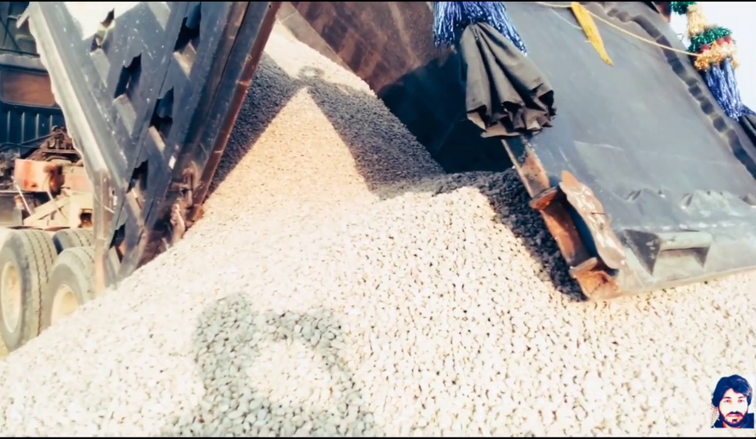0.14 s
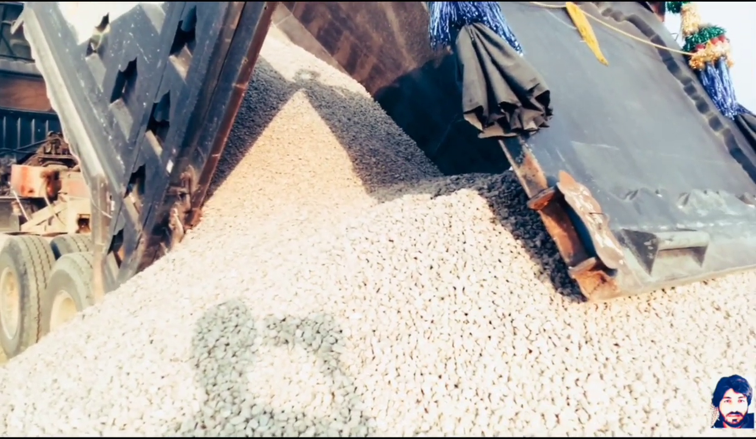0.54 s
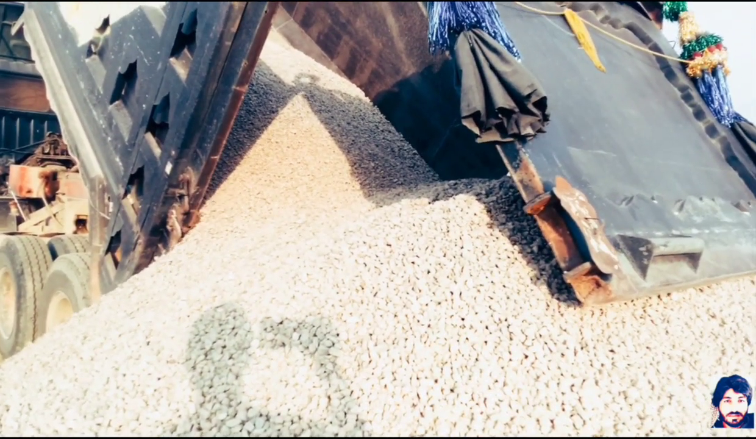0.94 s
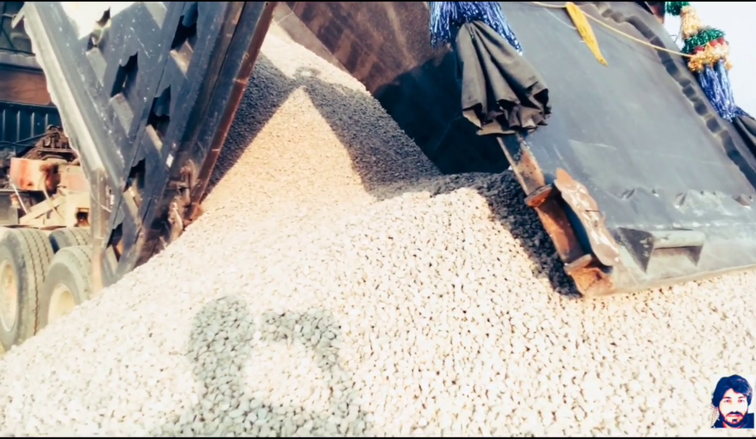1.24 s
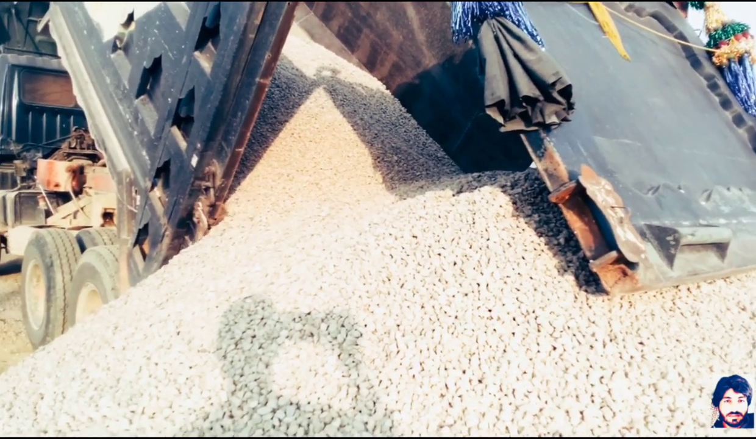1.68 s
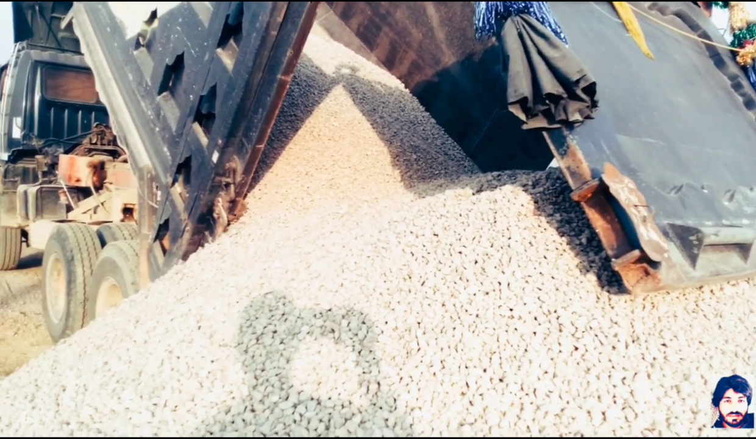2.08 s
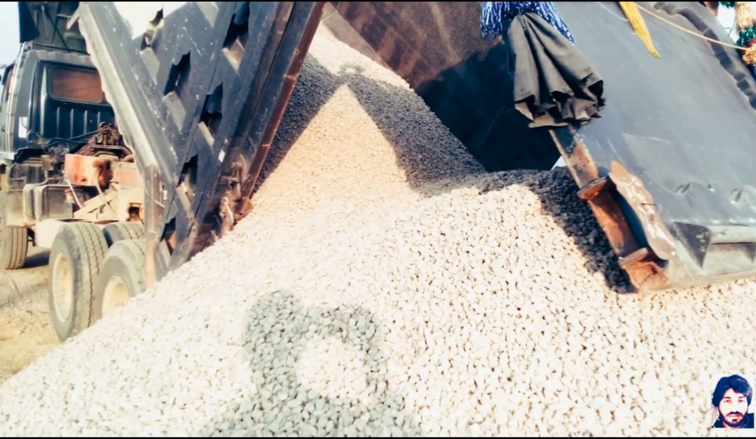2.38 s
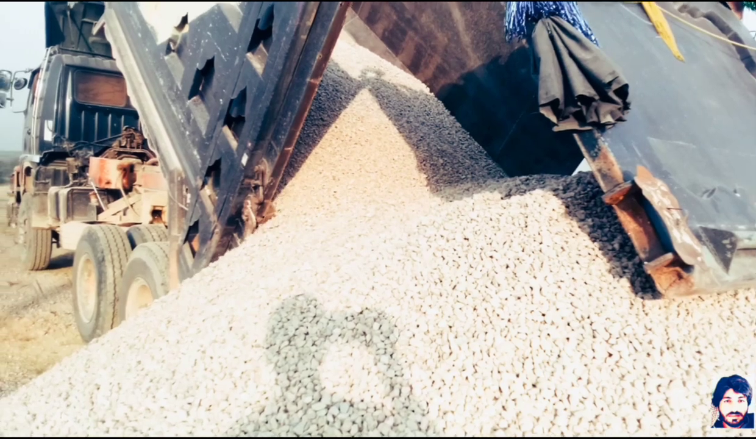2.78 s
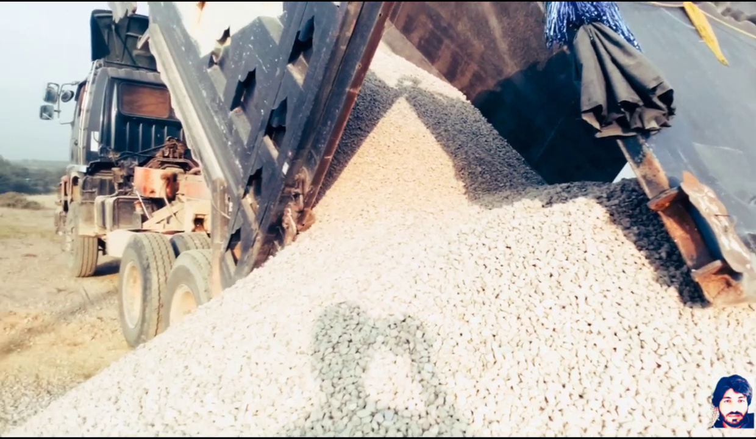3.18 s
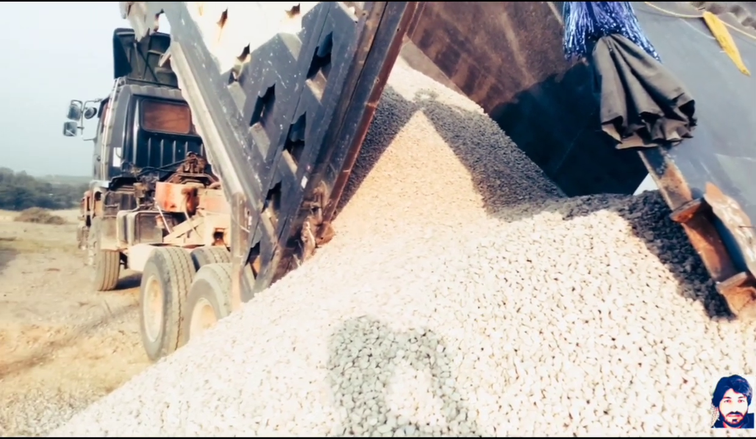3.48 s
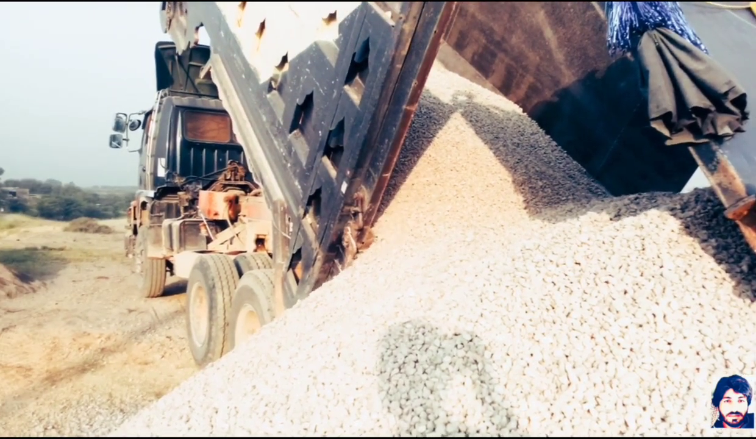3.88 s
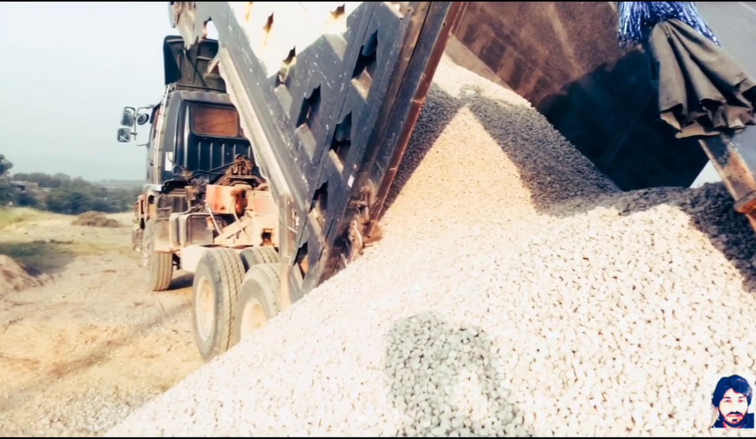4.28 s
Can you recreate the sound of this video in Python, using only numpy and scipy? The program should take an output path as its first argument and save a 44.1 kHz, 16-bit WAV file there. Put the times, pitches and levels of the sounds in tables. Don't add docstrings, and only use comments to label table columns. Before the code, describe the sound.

Close, crisp gravel slides from a tipped truck bed onto a heap in the open air. It pours hardest at first, lurching in bursts with stone clacks, spills and dull plate booms. A diesel idles steadily behind with rapid knocking and a weak low hum. Midway the microphone turns toward the cab and the stone tone shifts; the flow finally thins to stray pebbles and small squeaks. Small microphone, little bass.

```python
import sys
import numpy as np
from scipy import signal
from scipy.fft import rfft, irfft
from scipy.io import wavfile

SR = 44100
rng = np.random.default_rng(int(sys.argv[2]) if len(sys.argv) > 2 else 0)


def dump_mix(stems):
    frames = np.atleast_2d(stems).T
    limited = np.clip(frames, -1, 1)
    pcm = np.round(limited * 32767).astype(np.int16)
    wavfile.write(sys.argv[1], SR, pcm)


def ratio_of_db(decibels):
    return 10 ** (np.asarray(decibels, float) / 20)


N = 195451

# pitch in Hz, level in dB per Hz.
STONE_FACING_BED = [(880, -6), (1500, -2.5), (2050, -11), (2240, -7.5), (2490, -15.5), (2750, -6.5),
                    (4020, -3), (5820, 0), (6680, -7), (7430, -5), (8770, -7.5), (10700, -12), (13300, -23),
                    (15400, -9)]
# pitch in Hz, level in dB per Hz.
STONE_FACING_CAB = [(880, -23.5), (1500, -9), (1880, -13), (2400, -12), (2830, -5), (3340, -5), (3830, 1.5),
                    (4980, -5.5), (5770, 0), (6550, -4.5), (7360, -0.5), (10400, -14.5), (12500, -25),
                    (15400, -10.5)]
# time in seconds, level of the gravel in dB.
FLOW = [(0.0, -44), (0.38, -42.5), (0.46, -42), (1.18, -46.5), (1.29, -43), (2.05, -46), (2.43, -47.5),
        (2.76, -46.5), (2.94, -46.5), (3.39, -47.5), (3.82, -48.5), (4.06, -47), (4.18, -46.5),
        (4.43, -48.5)]
# lowest Hz, highest Hz, contacts per second,
# spread in dB, share of hard contacts, level in dB.
STONE_SIZES = [(2790, 6670, 3000, 1.4, 0.48, 0.12), (6530, 11120, 2200, 4.2, 0.9, 1.83),
               (10590, 18000, 1100, 5.5, 1.36, 6.0), (1207, 2716, 2000, 4.2, 1.1, 0.62)]
# time in seconds, grit in dB, dust in dB.
PUFFS = [(.33, -2, 5), (.66, 5.5, 4), (.75, 2.5, 4), (1.17, -2, 3), (1.24, 3.5, -5), (1.43, 1, -4),
         (1.5, 0, -4), (1.71, 3, 6), (1.91, 1, 4), (1.99, -2.5, 0), (2.03, 2, 1), (2.21, -1, 4),
         (2.39, 1, 2), (2.49, -5, -7), (2.512, -0.5, -1), (1.075, -4, -1), (2.59, 3, -7), (2.73, -2, -1),
         (2.91, -1.5, -2), (3.05, -3, 1), (3.16, 6.5, 3), (3.25, 3, 2), (3.39, 1, 2.5), (3.58, 3.5, 4),
         (3.69, 1, -6), (3.85, -2, 3), (3.91, -1.5, 1), (3.97, -2, 2), (4.06, 0, -2)]
# crest in seconds, big stones in dB, bed plate in dB, length in seconds.
LURCHES = [(0.0, -53, -54, 0.04), (0.139, -76, -60.5, 0.045), (0.223, -44, -63, 0.083),
           (0.325, -45, -64, 0.037), (0.5, -53.5, -64.5, 0.49), (0.756, -50.5, -61, 0.19),
           (1.34, -51, -63, 0.47), (1.536, -56, -70.5, 0.89), (1.842, -51, -102, 0.11),
           (2.088, -52.5, -67, 0.11), (2.314, -50.5, -64, 0.15), (2.66, -43.5, -61.5, 0.23),
           (2.854, -47, -67, 0.19), (2.953, -66, -59.5, 0.059), (3.178, -49.5, -65, 0.17),
           (3.443, -49.5, -67, 0.24), (4.265, -62, -66.5, 1), (1.017, -56, -62, 0.069),
           (1.65, -49, -81, 0.031), (1.975, -56, -80, 0.051), (3.085, -51, -79, 0.044),
           (3.74, -58, -63, 0.11), (4.245, -58, -65, 0.026)]
# start in seconds, peak in dB, centre in Hz, share of grit in dB.
SPILLS = [(0.2095, -17, 5940, -9), (0.299, -31, 4470, -5), (0.422, -19.5, 5340, -1),
          (0.5122, -38, 4460, -20), (0.5778, -25, 5320, 14.5), (0.653, -22, 4300, -19),
          (0.732, -19.5, 2900, -27), (0.812, -20, 6100, -13), (0.972, -22, 4000, -21),
          (1.156, -16, 5800, -5), (1.3155, -20, 5030, -8), (1.3826, -24.5, 5400, -13),
          (1.629, -24, 3900, -27), (1.7415, -20, 3970, -27), (1.7937, -26, 4180, 8), (1.808, -18, 5800, -3),
          (1.012, -22.5, 5200, -6), (1.198, -21, 5000, -6), (0.883, -22, 5200, -10),
          (2.579, -22.5, 5200, -8), (2.706, -23, 4600, -12), (3.115, -28, 4200, -8), (2.086, -18, 4670, -3),
          (2.2538, -19, 4930, -4), (2.269, -17.5, 4900, -12), (2.413, -24.5, 4600, 7),
          (2.527, -20.5, 4360, -9), (2.561, -23, 5600, -3), (2.615, -21.5, 4020, -18),
          (2.639, -23, 3400, -10), (2.66, -20.5, 4130, -18), (2.9463, -23.5, 3800, -2),
          (3.146, -19, 3280, -25), (3.352, -21, 4300, 4), (3.542, -21.5, 3540, -24),
          (3.721, -23, 4700, -20), (4.056, -15.5, 4700, -15), (4.365, -23, 5400, 1)]
# start in seconds, peak in dB, pitch in Hz.
CLACKS = [(0.1408, -27, 5680), (0.1494, -30, 4200), (0.1885, -30, 4300), (0.2122, -29, 5510),
          (0.219, -30, 5920), (0.2728, -36, 5250), (0.31, -26, 5800), (0.443, -29, 4330),
          (0.4561, -29, 5170), (0.477, -31, 4090), (0.493, -27, 4220), (0.515, -27, 5530),
          (0.519, -34, 4330), (0.5849, -25, 6090), (0.6155, -39, 5450), (0.6753, -30, 2840),
          (0.732, -38, 3900), (0.807, -20, 5960), (0.824, -26, 5810), (0.8307, -33, 4070),
          (0.8626, -33, 5450), (1.0058, -28, 5100), (1.1372, -20, 5580), (1.1569, -20, 4770),
          (1.1606, -26, 5530), (1.2051, -31, 4080), (1.266, -33, 4310), (1.3064, -26, 5700),
          (1.323, -28, 5250), (1.3254, -25, 4200), (1.331, -25, 5080), (1.3843, -26, 5490),
          (1.5287, -45, 5300), (1.5758, -34, 5750), (1.63, -24, 5560), (1.7478, -31, 5190),
          (1.7958, -27, 3810), (2.091, -21, 4360), (2.0952, -17, 5200), (2.2555, -27, 5430),
          (2.2753, -18, 4760), (2.415, -27, 4930), (2.616, -31, 3980), (2.6203, -33, 4330),
          (2.6453, -35, 2860), (2.662, -23, 5190), (2.7295, -28, 4670), (2.7395, -31, 5340),
          (2.8625, -28, 4030), (2.901, -28, 3700), (3.167, -30, 4090), (3.546, -31, 5960),
          (4.062, -26, 5480), (4.063, -25, 3680), (4.0707, -28, 4370), (4.072, -29, 4220),
          (4.367, -27, 5280)]
# start in seconds, peak in dB, peak of the bright edge in dB.
PEBBLES = [(0.126, -30, -47), (0.1683, -31, -39), (0.2155, -34, -45), (0.273, -26, -44), (0.3204, -33, -28),
           (0.4562, -25, -40), (0.5151, -27, -54), (0.5818, -34, -41), (0.5945, -25, -41),
           (0.7876, -21.5, -49), (0.8963, -34, -46), (0.9228, -31, -43), (0.9793, -39, -43),
           (0.9913, -26, -49), (1.005, -27, -38), (1.0662, -36, -44), (1.144, -24, -29), (1.1553, -34, -51),
           (1.165, -30, -43), (1.2053, -31, -44), (1.2195, -34, -47), (1.4617, -31, -46),
           (1.7957, -32, -51), (1.842, -29, -51), (1.885, -33, -50), (2.0977, -28, -47), (2.149, -29, -35),
           (2.1739, -31, -44), (2.2222, -35, -46), (2.2381, -32, -47), (2.3415, -28, -54),
           (2.3642, -34, -41), (2.4271, -25.5, -44), (2.4615, -35, -41), (2.7946, -24.5, -45),
           (2.8016, -28, -51), (2.8132, -35, -49), (3.0298, -36, -35), (3.0676, -35, -55),
           (3.2011, -29, -48), (3.2094, -32, -55), (3.2727, -32, -42), (3.3804, -28, -45),
           (3.3863, -26, -41), (3.4245, -29, -49), (3.4644, -29, -38), (3.6156, -26.5, -49),
           (3.817, -25, -50), (4.0359, -34, -41), (4.079, -27, -53), (4.142, -34, -43), (4.256, -45, -51),
           (4.3357, -23, -50), (4.3478, -36, -62), (4.3666, -36, -36), (4.403, -29, -44),
           (4.4203, -29, -47)]
# start in seconds, peak in dB, pitch in Hz.
DINGS = [(0.2134, -21.5, 2800), (0.31, -25, 2900), (0.312, -20, 2840), (0.7328, -26, 2900),
         (1.275, -23.5, 2700), (1.314, -23, 2350), (1.3833, -27, 2900), (1.632, -27, 2780),
         (2.2555, -27, 2830), (2.643, -20, 2900), (2.645, -22.5, 2200), (2.668, -26, 2260),
         (2.686, -32, 2550), (4.368, -27, 2790)]
# start in seconds, peak in dB, time to fall 60 dB in seconds.
PINGS = [
    (1.388, -54, .12),
    (1.648, -44, 0.34),
    (2.2538, -29.5, 0.18),
    (2.7387, -40, 0.09),
]
# start in seconds, length in seconds, first Hz, last Hz, peak in dB.
SQUEAKS = [(0.043, 0.024, 4100, 3990, -46), (.247, 0.051, 4130, 4140, -45), (0.317, 0.023, 4300, 4320, -44),
           (0.325, .012, 4300, 4230, -53), (0.482, 0.016, 4370, 4360, -43), (0.504, 0.019, 4210, 4390, -42),
           (0.657, .012, 4380, 4380, -43), (0.667, 0.017, 4380, 4380, -41), (0.856, 0.035, 4100, 4140, -42),
           (0.9, 0.02, 4350, 4300, -40.5), (1.261, 0.036, 4300, 4300, -47), (1.625, 0.044, 4250, 4230, -42),
           (1.663, .014, 4100, 3870, -46), (2.702, 0.015, 3930, 4050, -44), (3.44, .016, 4560, 4350, -43),
           (3.454, 0.018, 4180, 4100, -43), (3.476, .017, 4000, 3780, -44), (3.552, 0.033, 3660, 3730, -52),
           (4.138, 0.048, 4150, 4180, -44), (4.189, 0.014, 4170, 4130, -44.5),
           (4.227, .013, 4200, 4130, -44), (4.232, 0.052, 3470, 3660, -50),
           (3.373, 0.044, 2740, 2690, -49.5), (3.499, .014, 2750, 2800, -46),
           (4.037, 0.084, 2920, 2900, -54.5)]
# pitch in Hz, width in Hz, loose rattle in dB.
BLOCK_MODES = [(1028, 40, -64), (1135, 45, -64), (1258, 50, -55.5), (900, 60, -72), (1470, 120, -69)]
# crest in seconds after the
# cycle starts, level in dB.
KNOCKS = [
    [(0, -47), (.0136, -47), (.027, -53), (.038, -54), (.058, -53), (.098, -50), (.143, -46), (.1566, -51),
     (.177, -51), (.226, -58)],
    [(0, -42), (.0097, -47), (.054, -50), (.067, -53), (.098, -48), (.111, -50), (.1342, -49), (.143, -41),
     (.1544, -49), (.189, -50)],
    [(0, -41.5), (.00636, -42), (.044, -46), (.055, -48), (.069, -48), (.0885, -48), (.098, -44.5),
     (.116, -52), (.13505, -48), (.143, -44), (.15095, -47.5), (.176, -48), (.197, -49), (.232, -50)],
    [(.018, -54), (.051, -56), (.108, -57), (.14, -54), (.175, -56), (.193, -57)],
    [(.04, -55), (.092, -53), (.104, -54), (.178, -55), (.199, -55)],
]
CYCLE_EFFORT = [-0.46, -0.24, -0.36, 0.47, 0.83, -0.034, 1, 0.79, 0.3, -0.73, 0.9, 0.94, 0.64, 0.9, -0.011,
                -0.11, 1.3, 0.16]
# pitch in Hz, width in Hz, level in dB.
BED_RATTLE = [(1450, 240, -58.5), (564, 91, -67.5), (437, 127, -62), (2350, 80, -73), (2735, 17, -71.5),
              (2900, 390, -68)]
CYLINDER_PUFFS = [24, 21, 25, 32, 28, 19]
# pitch in Hz, level in dB, time to fall 60 dB in seconds.
EXHAUST_MODES = [(45.3, -102, .25), (69.4, -103, 0.22), (99, -68, 0.048), (125, -69.5, 0.11),
                 (151, -74, 0.066)]
# crest in seconds, level in dB, pitch
# in Hz.
BOOMS = [(0.03, -62, 409), (0.04, -63.5, 506), (0.13, -62.5, 597), (0.16, -57, 419), (0.42, -62, 866),
         (0.48, -63, 635), (0.62, -61, 602), (0.76, -63, 699), (0.77, -70, 834), (0.77, -58.5, 602),
         (0.8, -64.5, 231), (1.08, -65, 403), (1.36, -62, 597), (1.37, -63, 398), (1.39, -72, 899),
         (1.42, -65, 349), (2.31, -68, 586), (2.43, -63.5, 409), (2.68, -60, 651), (2.68, -58.5, 597),
         (2.75, -60.5, 527), (2.87, -59.5, 602), (2.9, -60.5, 888), (2.96, -64, 549), (3.18, -67, 882),
         (3.23, -62, 339), (3.47, -64, 597), (3.49, -63, 231), (3.61, -63, 888), (4.06, -61, 888),
         (4.21, -62, 823), (4.27, -64, 403), (4.31, -62, 893), (4.39, -63, 559)]
# crest in seconds, level in dB.
HUM_SWELLS = [(0.039, -52), (0.302, -50), (0.395, -48), (0.466, -48), (0.597, -56.5), (0.688, -55),
              (0.823, -53.5), (1.126, -49.5), (1.31, -54), (1.409, -52), (1.601, -51.5), (1.746, -57),
              (1.859, -44.5), (2.077, -50), (2.17, -50.5), (2.39, -57), (2.574, -55), (2.719, -52.5),
              (2.84, -53), (3.004, -48), (3.106, -56), (3.282, -49), (3.362, -58), (3.509, -72),
              (3.693, -61), (3.795, -58), (4.063, -51.5), (4.186, -59), (4.266, -61), (4.371, -60)]
# pitch in Hz, level in dB per Hz.
GROUND = [(18, -39), (30, -9.5), (146, -3), (233, -0.5), (337, -19), (417, -13), (495, -7), (596, -8),
          (759, -14.5), (900, -8), (1170, 6.5), (1980, -120)]
# delay in seconds, level in dB.
WALLS = [(.007, -24), (.013, -15), (.022, -32), (.037, -16.5)]

TURN_START_S, TURN_END_S = 1.54, 3.8
GRIT_DB, GRIT_FOLLOWS = -47.5, 0.31
DUST_DB, DUST_FOLLOWS = -53.5, 0.11
PUFF_S = 0.015
LURCH_FALL_DB, LURCH_RISE = 20.5, 0.72
REST_STONES_DB, REST_PLATE_DB, REST_SAG_DB_PER_S = -57.5, -74.5, 1
SPILL_T60_S, SPILL_SHORTER_PER_S = 0.068, 0.017
SPILL_LONGER_PER_DB, SPILL_SWELL_S = .05, .003
SPILL_HOLD = 1.8
CLACK_CYCLES = 11.4
PING_HZ = 7926
SQUEAK_FADE_DB, SQUEAK_CREST = 4, 0.55
CYCLE_ZERO_S, CYCLE_S = .1255, .26853
HUNT_S, HUNT_CYCLES = .0017, 14.5
KNOCK_DB, KNOCK_SAG_DB_PER_S = 2.5, 0.5
BOOM_S = 0.026
SWELL_S, SWELL_REST_DB = 0.027, -60
LOW_DB, LOW_FOLLOWS = -59, 0.45
DRONE_DB, DRONE_FOLLOWS = -68.5, 1.53
FRAME_DB, FRAME_FOLLOWS, FRAME_SAG_DB_PER_S = -62.5, 0.78, 2
OVERLOAD = .075
TOP_HZ = 15480


def rms_one(x):
    return x / np.sqrt(np.mean(x ** 2) + 1e-20)


def drift(rate):
    r = np.exp(-40 * np.pi * rate / SR)
    noise = rng.standard_normal(N // 20 + 2002)
    slow = signal.lfilter([1], [1, -2 * r, r * r], noise)[2000:]
    return np.interp(np.arange(N) / 20, np.arange(len(slow)), rms_one(slow))


def band(x, low_hz, high_hz, order=2):
    edges = [low_hz, min(high_hz, .45 * SR)]
    return signal.sosfilt(signal.butter(order, edges, "band", fs=SR, output="sos"), x)


def ring(clicks, hz, t60):
    r = ratio_of_db(-60 / (t60 * SR))
    w = 2 * np.pi * hz / SR
    return signal.lfilter([0, np.sin(w)], [1, -2 * r * np.cos(w), r * r], clicks + 1e-18)


def colour(x, spectrum):
    hz, db = np.transpose(spectrum)
    grid = np.linspace(1, SR / 2, 4097)
    curve_db = np.maximum(np.interp(np.log(grid), np.log(hz), db), -60)
    cepstrum = irfft(np.log(ratio_of_db(curve_db)))
    cepstrum[1:4096] *= 2
    cepstrum[4097:] = 0
    return signal.fftconvolve(x, irfft(np.exp(rfft(cepstrum))))[:N]


def strikes(times, gains):
    at = np.round(np.asarray(times) * SR).astype(int)
    clicks = np.zeros(N)
    inside = (at >= 0) & (at < N)
    np.add.at(clicks, at[inside], np.asarray(gains)[inside])
    return clicks


def grains(per_s, spread_db, size=N):
    sizes = ratio_of_db(spread_db * np.minimum(rng.exponential(1, size), 4.2))
    sizes = sizes * rng.choice([-1, 1], size)
    return rms_one(sizes * (rng.random(size) < per_s / SR))


def bells(times, heights, width):
    t = np.arange(N) / SR
    return sum(h * np.exp(-((t - s) / width) ** 2) for s, h in zip(times, heights))


def heard(x):
    late = np.interp(np.arange(N) / SR, [TURN_START_S, TURN_END_S], [0, 1])
    return (1 - late) * colour(x, STONE_FACING_BED) + late * colour(x, STONE_FACING_CAB)


def pouring_db():
    s, db = np.transpose(FLOW)
    return np.interp(np.arange(N) / SR, s, db)


def lurch_db(column, rest_db):
    t = np.arange(N) / SR
    power = ratio_of_db(rest_db - REST_SAG_DB_PER_S * t) ** 2
    for row in LURCHES:
        after = (t - row[0]) / max(row[3], .01)
        lost_db = LURCH_FALL_DB * np.maximum(after, -after / LURCH_RISE)
        power = power + ratio_of_db(row[column] - lost_db) ** 2
    return 10 * np.log10(power)


def slide():
    surge = drift(38)
    hard = grains(1200, 5.0)
    flow_db = pouring_db()
    swing = flow_db - flow_db.mean()
    s, grit_db, dust_db = np.transpose(PUFFS)
    levels = [flow_db + 0.48 * bells(s, np.minimum(grit_db, 0), PUFF_S),
              GRIT_DB + GRIT_FOLLOWS * swing + bells(s, grit_db, PUFF_S),
              DUST_DB + DUST_FOLLOWS * swing + bells(s, dust_db, PUFF_S),
              lurch_db(column=1, rest_db=REST_STONES_DB)]
    out = 0
    for (low_hz, high_hz, per_s, spread_db, share, db), level_db in zip(STONE_SIZES, levels):
        edges = np.geomspace(low_hz, high_hz, 5)
        patches = 0
        for low, high in zip(edges, edges[1:]):
            contacts = share * hard + 0.52 * grains(per_s, spread_db)
            hiss = 0.48 * rng.standard_normal(N)
            patches = patches + ratio_of_db(1.54 * drift(15.0)) * band(contacts + hiss, low, high)
        out = out + rms_one(heard(patches)) * ratio_of_db(level_db + db + 1.05 * surge + .4 * drift(30))
    return out


def ringing_stones():
    pitches = np.geomspace(2200, 6200, 20)
    dealt = rng.integers(0, 20, N)
    ticks = grains(500, 3.6)
    rings = sum(ring(ticks * (dealt == k), hz, 200.0 / hz) for k, hz in enumerate(pitches))
    return ratio_of_db(pouring_db() - 8.0) * rms_one(heard(rings))


def spills():
    out = np.zeros(N)
    t = np.arange(8000) / SR
    for s, db, hz, grit_db in SPILLS:
        t60 = SPILL_T60_S * (1 - SPILL_SHORTER_PER_S * s) * np.exp(SPILL_LONGER_PER_DB * (db + 24.0))
        fade = ratio_of_db(-60 * (t / np.clip(t60, .02, .3)) ** SPILL_HOLD)
        ticks = grains(9000, 3.7, size=8000) * fade * np.minimum(t / SPILL_SWELL_S, 1)
        burst = .9 * band(ticks, 2700, 6500, order=1)
        burst = burst + .6 * band(ticks, hz / 1.2, hz * 1.2)
        burst = burst + ratio_of_db(grit_db - 1.5) * band(ticks, 6800, 12000)
        i = int(s * SR)
        out[i:i + 8000] += ratio_of_db(db - 9.5) * burst[:N - i]
    return heard(out)


def clacks():
    out = np.zeros(N + 600)
    tap = np.eye(1, N)[0][:600]
    for s, db, hz in CLACKS:
        i = int((s - .0003) * SR)
        knock = band(ring(tap, hz, CLACK_CYCLES / hz), 2500, 6500)
        out[i:i + 600] += ratio_of_db(db + 1.5) * knock
    return out[:N]


def pebbles():
    s, db, edge_db = np.transpose(PEBBLES)
    body = band(ring(strikes(s - .0003, ratio_of_db(db + 5.5)), 8100, 0.0014), 4700, 13000)
    edge = band(strikes(s - .0002, ratio_of_db(edge_db + 13.0)), 10700, 17000)
    scatter = signal.lfilter([1], [1, -np.exp(-1 / (0.002 * SR))], strikes(s, ratio_of_db(db - 3.0)))
    return body + edge + band(scatter * rng.standard_normal(N), 5000, 9400)


def struck_steel():
    dings = sum(ring(strikes([s], [ratio_of_db(db - 13.5)]), hz, 0.032) for s, db, hz in DINGS)
    return dings + sum(ring(strikes([s], [ratio_of_db(db)]), PING_HZ, t60) for s, db, t60 in PINGS)


def squeaks():
    out, t = np.zeros(N), np.arange(N) / SR
    waver, flutter = drift(120), drift(220)
    for s, length, first_hz, last_hz, db in SQUEAKS:
        gone = np.clip((t - s) / length, 0, 1)
        gate = np.clip(np.minimum(t - s, s + length - t) / 0.0006, 0, 1)
        hz = first_hz + (last_hz - first_hz) * gone
        fade_db = SQUEAK_FADE_DB * abs(gone - SQUEAK_CREST) / (1 - SQUEAK_CREST)
        tone = np.sin(2 * np.pi * np.cumsum(hz * (1 + .009 * waver)) / SR)
        out += gate * ratio_of_db(db + 1.5 - fade_db + 2.8 * flutter) * tone
    return out


def cycle_starts():
    k = np.arange(-1, 17)
    return CYCLE_ZERO_S + CYCLE_S * k - HUNT_S * (1 - np.cos(2 * np.pi * k / HUNT_CYCLES))


def block_knocks():
    start = cycle_starts()
    cycle_db = KNOCK_DB - KNOCK_SAG_DB_PER_S * start + np.array(CYCLE_EFFORT)
    crest_s = .0034
    t60 = crest_s * np.log(1000)
    out = 0
    for (hz, _, _), knocks in zip(BLOCK_MODES, KNOCKS):
        after, db = np.transpose(knocks)
        jitter = .00005 * rng.standard_normal((len(start), len(after)))
        times = start[:, None] + after - np.round(crest_s * hz) / hz + jitter
        gains = ratio_of_db(cycle_db[:, None] + db + 1.0 * rng.standard_normal(times.shape))
        hits = strikes(times.ravel(), gains.ravel())
        out = out + ring(ring(hits, hz, t60), hz, 0.88 * t60) * 2 * np.e / (crest_s * SR)
    return ratio_of_db(-0.5) * out


def rattle():
    loose = grains(1500, 1.15)
    shaken_db = lurch_db(column=1, rest_db=REST_STONES_DB) + 60.5
    out = 0
    for hz, width, db in BLOCK_MODES:
        shake = ring(ring(loose, hz, 2.2 / width), hz, .7 / width)
        out = out + ratio_of_db(db + 1.5 * drift(8)) * rms_one(shake)
    for hz, width, db in BED_RATTLE:
        shake = band(ring(loose, hz, 1.2 / width), hz - width - 40, hz + width + 40)
        out = out + ratio_of_db(db + 0.18 * shaken_db + 1.25 * drift(3.4)) * rms_one(shake)
    return out


def exhaust():
    start = cycle_starts()
    times = start[:-1, None] + np.diff(start)[:, None] * (np.arange(6) + 0.295) / 6
    gains = ratio_of_db(CYLINDER_PUFFS + 1.5 * rng.standard_normal(times.shape))
    puffs = strikes(times.ravel(), gains.ravel())
    out = 0
    for k, (hz, db, t60) in enumerate(EXHAUST_MODES):
        out = out + ratio_of_db(db) * rms_one(ring(puffs, hz, t60)) * (-1) ** k
    return out


def booms():
    turns = 2 * np.pi * np.cumsum(1 + .006 * drift(15)) / SR
    return sum(bells([s], [ratio_of_db(db + 5.5)], BOOM_S) * np.sin(hz * turns) for s, db, hz in BOOMS)


def swells_db():
    s, db = np.transpose(HUM_SWELLS)
    return 10 * np.log10(ratio_of_db(SWELL_REST_DB) ** 2 + bells(s, ratio_of_db(db) ** 2, SWELL_S))


def rumble():
    hum_db = swells_db()
    swing = hum_db - hum_db.mean()
    plate_db = lurch_db(column=2, rest_db=REST_PLATE_DB)
    frame_db = FRAME_DB + FRAME_FOLLOWS * (plate_db - plate_db.mean())
    frame_db = frame_db - FRAME_SAG_DB_PER_S * np.arange(N) / SR
    dull = colour(rng.standard_normal(N), GROUND)
    low = ratio_of_db(LOW_DB + LOW_FOLLOWS * swing + 1.7 * drift(11.0)) * rms_one(band(dull, 58, 250))
    frame = ratio_of_db(frame_db + 3.0 * drift(3.4)) * rms_one(band(dull, 250, 450))
    plate = ratio_of_db(plate_db + 12.5) * rms_one(band(dull, 450, 950))
    drone = np.sqrt(2) * np.sin(2 * np.pi * np.cumsum(151 * (1 + 0.026 * drift(6.6))) / SR)
    return low + frame + plate + ratio_of_db(DRONE_DB + DRONE_FOLLOWS * swing + 2.4 * drift(13.0)) * drone


def echoes(x):
    dull = signal.lfilter([.6], [1, -.4], x)
    return x + sum(ratio_of_db(db) * np.r_[np.zeros(int(s * SR)), dull][:N] for s, db in WALLS)


def scene():
    near = echoes(spills() + clacks() + pebbles() + struck_steel() + squeaks())
    stones = slide() + ringing_stones() + near
    engine = block_knocks() + rattle() + exhaust()
    return (stones + engine + booms() + rumble())[None]


def top_cut(x):
    return signal.sosfilt(signal.butter(12, 15770, fs=SR, output="sos"), x)


def record(dry):
    x = signal.sosfilt(signal.butter(4, 47, "high", fs=SR, output="sos"), dry)
    port_hz, port_width_hz, port_db = 6675, 340, -18
    port = signal.lfilter(*signal.iirpeak(port_hz, port_hz / port_width_hz, fs=SR), x)
    x = x - (1 - ratio_of_db(port_db)) * port
    x = OVERLOAD * np.tanh(x / OVERLOAD)
    x = signal.sosfilt(signal.ellip(10, .1, 33, TOP_HZ, fs=SR, output="sos"), x)
    x = signal.sosfilt(signal.ellip(8, .1, 40, TOP_HZ + 330, fs=SR, output="sos"), x)
    return top_cut(x)


dry = scene()
out = record(dry)
dump_mix(out)
```